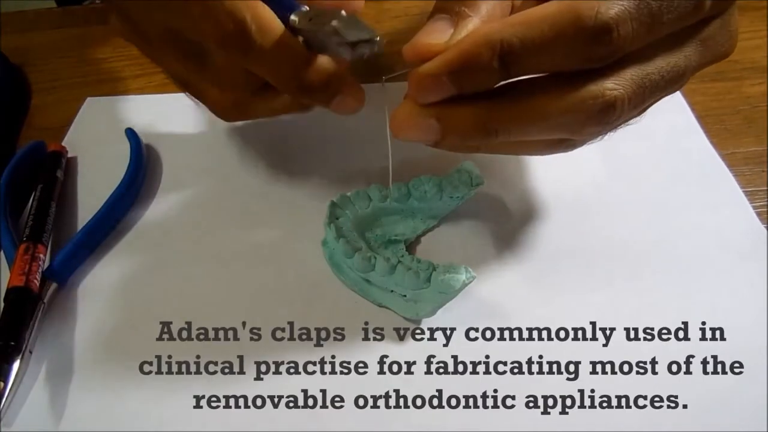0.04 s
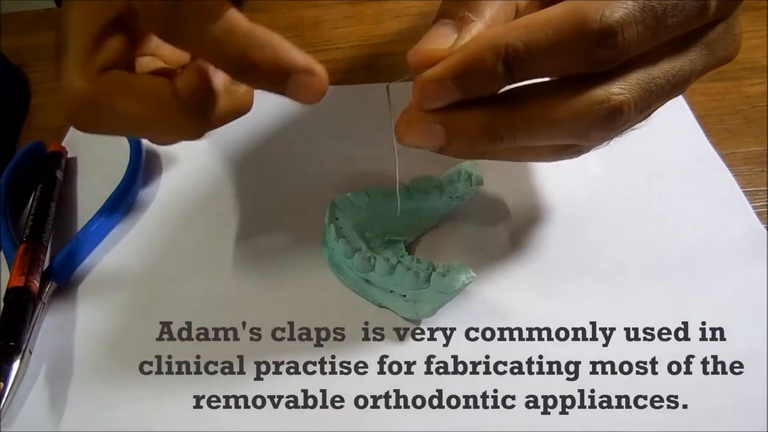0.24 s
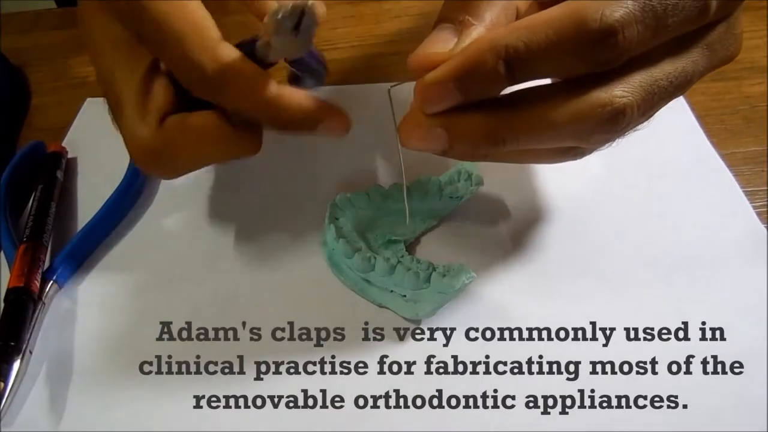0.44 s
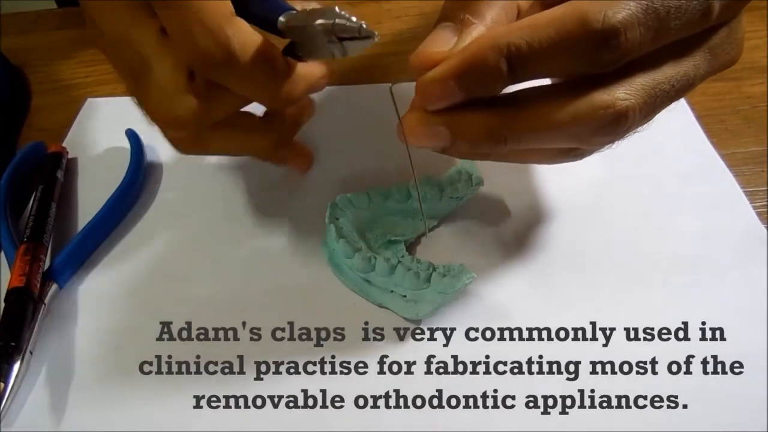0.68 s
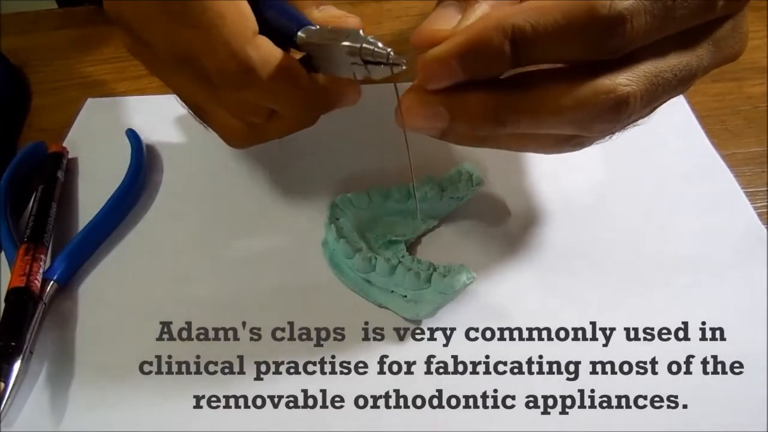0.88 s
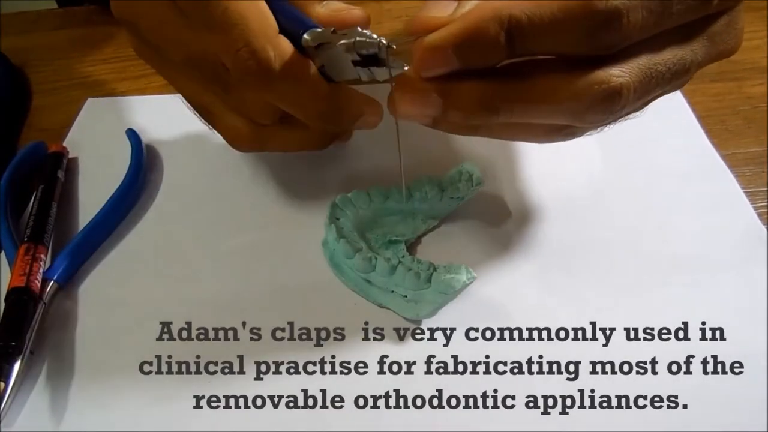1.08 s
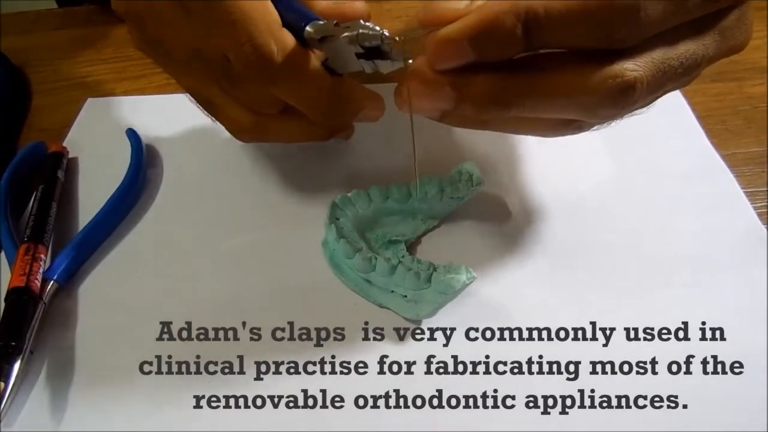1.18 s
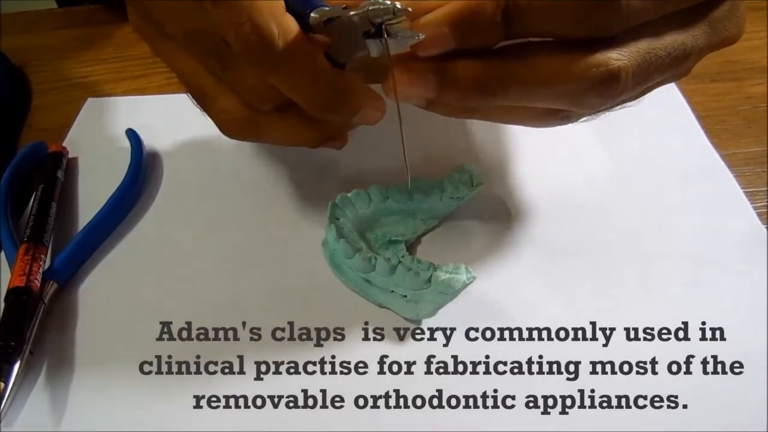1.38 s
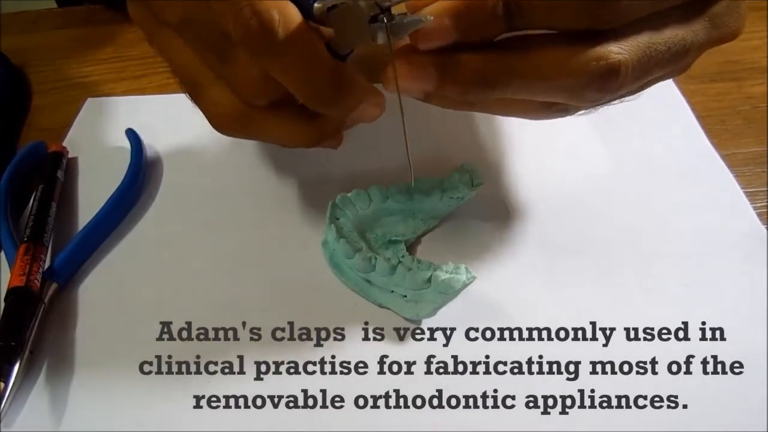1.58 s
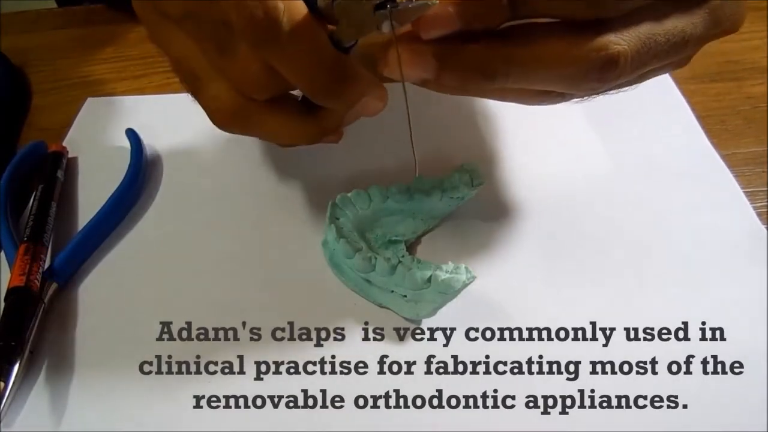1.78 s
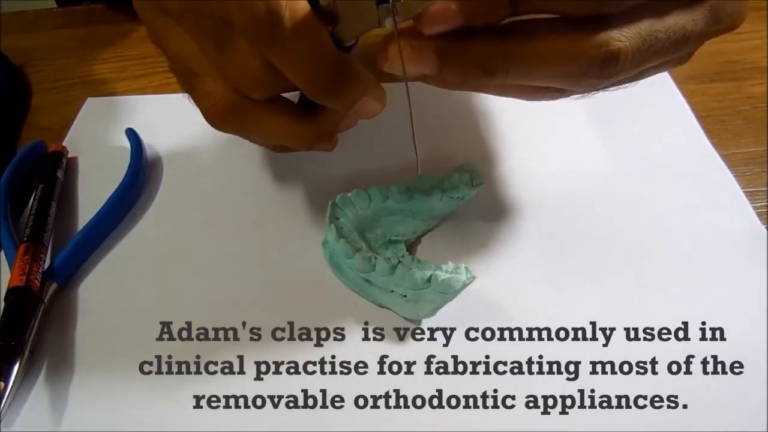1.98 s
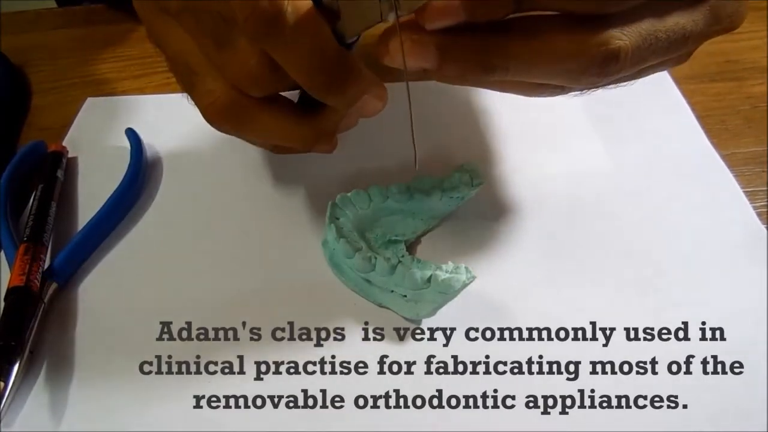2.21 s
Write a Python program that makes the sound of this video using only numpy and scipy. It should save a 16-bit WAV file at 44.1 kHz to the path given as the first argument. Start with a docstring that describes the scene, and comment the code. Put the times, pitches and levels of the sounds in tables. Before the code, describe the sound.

Steel pliers clack close to the microphone, then snap shut as the wooden table gives a short, booming knock. Fingers rub softly, and the jaws tick and scrape on a thin wire in a quiet room.

```python
"""Over the faint rumble of a quiet room, steel pliers clack and bounce, close to the microphone.
The jaws snap shut in a bright cluster of contacts; the wooden work table knocks, booms and echoes.
Then the jaws tick and scrape on a thin wire. In between, fingers rub as they shift their grip.
Struck steel and wood ring in their modes; scrapes and rubs are showers of tiny slips."""
import sys
import numpy as np
from scipy import signal
from scipy.fft import rfft, irfft
from scipy.io import wavfile
from scipy.ndimage import uniform_filter1d, minimum_filter1d

SR = 44100
rng = np.random.default_rng(int(sys.argv[2]) if len(sys.argv) > 2 else 0)


def dump_mix(stems):
    """Bounce the given channels to the path in sys.argv[1] as a 16-bit WAV at rate SR."""
    frames = np.atleast_2d(stems).T  # one column per channel
    limited = np.clip(frames, -1, 1)  # hard clip at full scale
    pcm = np.round(limited * 32767).astype(np.int16)
    wavfile.write(sys.argv[1], SR, pcm)


N = 99225
T = np.arange(N) / SR


def amp(db):
    """Decibels to gain."""
    return 10 ** (np.asarray(db) / 20)


def unit_rms(x):
    """Scales to rms 1."""
    return x / np.sqrt(np.mean(x ** 2) + 1e-20)


def curve_at(points, hz):
    """Interpolates a table on a log-frequency axis."""
    freqs, values = np.transpose(points)
    return np.interp(np.log(hz + 1), np.log(freqs + 1), values)


def colour(x, spectrum):
    """Gives a signal a spectrum, at rms 1."""
    gain = amp(curve_at(spectrum, np.fft.rfftfreq(x.shape[-1], 1 / SR)))
    return unit_rms(irfft(rfft(x) * gain, x.shape[-1]))


def noise(likeness, size=N):
    """White noise at two microphones, from unrelated (likeness 0) to identical (1)."""
    common, left, right = rng.standard_normal((3, size))
    return np.sqrt(likeness) * common + np.sqrt(1 - likeness) * np.array([left, right])


def add(mix, start_s, sound):
    """Mixes a sound in at a time."""
    part = mix[:, max(round(start_s * SR), 0):][:, :sound.shape[-1]]
    part += sound[..., :part.shape[1]]


def pan(left_db):
    """Gains for a left-minus-right level."""
    return amp(np.array([[left_db], [-left_db]]) / 2)


def left_leads(x, by_s):
    """The sound reaches the left microphone a little before the right."""
    shift = np.exp(1j * np.pi * np.fft.rfftfreq(N, 1 / SR) * np.array([[by_s], [-by_s]]))
    return irfft(rfft(x) * shift, N)


def low_cut(x, hz):
    """A small body radiates little below its first mode."""
    return signal.sosfilt(signal.butter(2, hz, "high", fs=SR, output="sos"), x)


def ring(modes, contact_s, size=4096):
    """A struck body's modes build up during contact, then die away."""
    t = T[:size]
    sines = sum(amp(db - 60 * t / t60) * np.sin(2 * np.pi * hz * t) for hz, db, t60 in modes)
    return (1 - np.exp(-t / contact_s)) * sines


def click(spectrum, size=2048):
    """One sharp click with a given spectrum, energy 1."""
    log_gain = np.log(amp(curve_at(spectrum, abs(np.fft.fftfreq(size, 1 / SR)))))
    minimum_phase = np.exp(np.conj(signal.hilbert(log_gain)))
    pulse = irfft(minimum_phase[:size // 2 + 1], size)
    return pulse / np.linalg.norm(pulse)


def burst(spectrum, t60, likeness, size=4096):
    """The dense resonances of a hard contact, as fading noise."""
    fade = amp(-60 * T[:size] / t60)
    rattle = unit_rms(noise(likeness, size) * fade) * np.sqrt(np.mean(fade ** 2))
    return signal.fftconvolve(rattle, click(spectrum)[None], axes=1)[:, :size]


def friction(spectrum, likeness, slips_per_s=9000, spread_db=3.5):
    """Surfaces slide in many tiny slips of uneven size."""
    slips = rng.random(N) < slips_per_s / SR
    sizes = amp(spread_db * np.minimum(rng.exponential(1, N), 4))
    return colour(noise(likeness) * slips * sizes, spectrum)


# The quiet room at the microphone. Each row: frequency in Hz, relative level in dB.
ROOM_TONE = [(12, -36), (20, 2.5), (106, -11), (137, -10.5), (252, -16), (298, -7.5), (324, -19.5),
             (393, -14.5), (565, -18), (631, -14.5), (686, -18), (2210, -21), (15500, -22)]
# How alike it is left and right. Each row: frequency in Hz, correlation.
TONE_LIKENESS = [(60, 0.79), (180, 0.21), (550, 0.28), (1650, 0.045), (4970, 0.02), (15000, 0.15)]


def room_tone():
    """Steady room rumble and microphone hiss."""
    left, unrelated = rfft(rng.standard_normal((2, N)))
    likeness = curve_at(TONE_LIKENESS, np.fft.rfftfreq(N, 1 / SR))
    right = likeness * left + np.sqrt(1 - likeness ** 2) * unrelated
    return amp(-46) * colour(irfft(np.array([left, right]), N), ROOM_TONE)


# Pliers landing close by. Each row: start in seconds, level in dB, low-mode gain in dB.
BOUNCES = [(0.2213, 0.5, -4.5), (.2225, -0.5, 5.5), (0.2279, -4, -9), (0.2315, -18.5, 1.5)]
# Their ringing steel. Each row: frequency in Hz, relative level in dB, t60 in seconds.
PLIER_MODES = [(1754, -20, 0.013), (3760, -14.5, 0.012), (4603, -5, .015), (6450, -9.5, .009),
               (9310, -5.5, 0.012), (9430, -1, 0.012), (12250, -12, .007), (13270, -15, .007),
               (13720, -7, 0.017), (14700, -18, 0.0054)]
# The crack of each contact. Each row: frequency in Hz, relative level in dB.
CRACK_SPECTRUM = [(200, -42), (1000, -37), (1700, -11.5), (2700, -21), (4500, -21), (7500, -10.5),
                  (9500, -5), (11200, -5.5), (13500, 1), (16000, -15)]


def plier_clacks():
    """Steel lands and bounces, each contact a crack and a short ring."""
    rings, cracks, to_room = np.zeros((3, 2, N))
    for start, db, low_db in BOUNCES:
        modes = [(hz, level + low_db * (hz < 8000), t60) for hz, level, t60 in PLIER_MODES]
        add(rings, start, amp(db) * low_cut(ring(modes, contact_s=0.0005), hz=1430))
        add(cracks, start, amp(db - 10.5) * burst(CRACK_SPECTRUM, t60=0.011, likeness=0.51))
    add(to_room, BOUNCES[0][0], amp(-1.5) * click(CRACK_SPECTRUM))
    to_room += amp(-22) * rings  # the ring reaches the room less than the landing's crack
    direct = left_leads(rings + cracks, by_s=18e-6) * pan(left_db=-1)
    return direct + room_tail(to_room, decay_scale=0.45, likeness=0.18)


# The room around the table. Each row: frequency in Hz, t60 in seconds before decay_scale.
ROOM_DECAY = [(200, 0.24), (1500, 0.69), (4500, 0.54), (10000, 0.41), (15000, 0.32)]


def room_tail(x, decay_scale, likeness):
    """The room answers with a diffuse tail that lasts longest in the midrange."""
    hz, t, bands = signal.stft(noise(likeness, size=SR // 2), SR, nperseg=256)
    t60 = decay_scale * curve_at(ROOM_DECAY, hz)[:, None]
    tail = signal.istft(bands * amp(-60 * t / t60), SR, nperseg=256)[1]
    tail *= 1 - np.exp(-T[:tail.shape[1]] / 0.018)  # reflections build up
    return signal.fftconvolve(x, tail / np.linalg.norm(tail[0]), axes=1)[:, :N]


def stroke(middle_s, half_s, db):
    """Smooth rise and fall of one sliding movement."""
    return amp(db) * np.exp(-.5 * ((T - middle_s) / half_s) ** 2)


# Fingers on handles and paper, close up.
# Each row: middle and half length in seconds, hiss level in dB, body level in dB.
GRIP_SHIFTS = [(0.356, 0.023, -48, -54), (.545, 0.019, -42, -58), (.928, 0.025, -46, -54),
               (1.047, 0.077, -52.5, -59), (1.24, 0.023, -48, -52), (1.417, 0.037, -55.5, -52.5),
               (1.675, 0.025, -64, -60)]
# The hiss of a rub and its dull body. Each row: frequency in Hz, relative level in dB.
RUB_HISS_SPECTRUM = [(300, -5.5), (2000, -8), (4500, -3.5), (7000, -8.5), (9000, 0), (12500, -0.5),
                     (16000, -7)]
RUB_BODY_SPECTRUM = [(40, -21), (150, -2), (330, -5.5), (700, -10.5), (1500, -22), (5000, -20)]


def finger_rubs():
    """Skin slides softly, each rub a hiss over a dull body."""
    hiss_level = sum(stroke(middle, half, db) for middle, half, db, _ in GRIP_SHIFTS)
    body_level = sum(stroke(middle, half, db) for middle, half, _, db in GRIP_SHIFTS)
    hiss = hiss_level * friction(RUB_HISS_SPECTRUM, likeness=0.19)
    body = body_level * friction(RUB_BODY_SPECTRUM, likeness=0.73)
    return hiss + body


# Jaws shutting and settling near the microphone.
# Each row: start in seconds, level in dB, t60 of the crack in seconds.
JAW_CONTACTS = [(0.6306, -10, 0.0067), (0.6327, -6.5, 0.012), (0.633, -11.5, 0.023), (.6425, -28, 0.044),
                (0.797, -35, 0.023)]
# The crack of jaw on jaw. Each row: frequency in Hz, relative level in dB.
JAW_SPECTRUM = [(60, -40), (700, -21), (1500, -17), (3200, -13), (4500, -10), (7300, -7), (9000, 0),
                (10000, -6.5), (11200, -2), (13400, -0.5), (15800, -6.5)]
# The ringing jaws. Each row: frequency in Hz, relative level in dB, t60 in seconds.
JAW_RING = [(2790, -21, .012), (4280, -10.5, 0.0089), (5960, -7.5, 0.017), (8980, -2, 0.013),
            (11600, -1.5, 0.012), (13060, -3, 0.023), (15400, -2, .008)]


def jaw_snaps():
    """Jaws close in a quick cluster of bright contacts; the first leaves an even hiss in the room."""
    contacts, to_room = np.zeros((2, 2, N))
    for start, db, t60 in JAW_CONTACTS:
        crack = burst(JAW_SPECTRUM, t60, likeness=0.33)
        add(contacts, start, amp(db) * (ring(JAW_RING, contact_s=0.0005) + crack))
    add(to_room, JAW_CONTACTS[0][0], click(JAW_SPECTRUM))
    direct = left_leads(contacts, by_s=24e-6) * pan(left_db=1)
    return direct + room_tail(to_room, decay_scale=1.26, likeness=0.15)


# The table's knocks, and the boom's soft second swell echoing about 55 ms after the first.
# Each row: start in seconds, level in dB, rise time in seconds.
KNOCKS_AND_ECHO = [(.6310, 1.5, 0.0014), (.684, -6, 0.0079), (0.911, -19, 0.0074)]
# The wooden top, close up. Each row: frequency in Hz, relative level in dB, t60 in seconds.
WOOD_MODES = [(143.9, -32.5, 0.51), (233.3, -47, 0.33), (283, -10.5, 0.034), (294.4, -36, 0.26),
              (426, -34, 0.32), (481, -30.5, 0.092), (869, -21.5, 0.038), (978, -37.5, 0.19),
              (1037, -23.5, 0.043)]
# The table heard through the room. Each row: frequency in Hz, relative level in dB.
BOOM_SPECTRUM = [(40, -29), (100, -17.5), (160, -3.5), (310, -1), (470, -6.5), (720, -17.5), (1080, -15),
                 (1450, -31.5), (4000, -68)]


def table_knocks_and_echo():
    """The table top thumps and booms on; a room reflection swells the first boom again."""
    out = np.zeros((2, N))
    build_up = 1 - np.exp(-T[:SR] / 0.014)
    for start, db, rise_s in KNOCKS_AND_ECHO:
        boom = build_up * burst(BOOM_SPECTRUM, t60=0.32, likeness=0.84, size=SR)
        wood = low_cut(ring(WOOD_MODES, rise_s, size=SR), hz=106)
        add(out, start, amp(db) * (wood + amp(-26.5) * boom))
    return out


# Jaws touching the wire, close up. Each row: start in seconds, level in dB, t60 in seconds.
WIRE_TICKS = [(1.167, -35, 0.018), (1.187, -21, 0.017), (1.236, -40, 0.023), (1.241, -34.5, 0.029),
              (1.433, -30.5, 0.015), (1.445, -41, .015)]
# Wire sliding in the jaws. Each row: middle and half length in seconds, level in dB.
WIRE_SCRAPES = [(1.188, 0.015, -49), (1.251, 0.019, -45), (1.439, 0.0077, -43)]
# The thin tone of a tick and of a scrape. Each row: frequency in Hz, relative level in dB.
TICK_SPECTRUM = [(500, -36), (2500, -22), (3900, -7), (5500, -16), (8300, -5.5), (10500, -10), (12800, 4),
                 (14000, 1), (16000, -8.5)]
SCRAPE_SPECTRUM = [(500, -17), (3000, -18), (6000, -18), (8500, -6), (10500, -17), (12700, 2), (13600, -7),
                   (16000, -24)]


def wire_in_jaws():
    """Thin ticks and short scrapes as the jaws take hold of the wire."""
    direct = friction(SCRAPE_SPECTRUM, likeness=0.4) * sum(stroke(*row) for row in WIRE_SCRAPES)
    for start, db, t60 in WIRE_TICKS:
        add(direct, start, amp(db) * burst(TICK_SPECTRUM, t60, likeness=0.23))
    tail = room_tail(direct, decay_scale=0.79, likeness=0.2)
    return direct * pan(left_db=0.5) + amp(-14) * tail


def scene():
    """Everything that reaches the microphones at the table."""
    return (room_tone() + plier_clacks() + finger_rubs() + jaw_snaps()
            + table_knocks_and_echo() + wire_in_jaws())


def record(dry):
    """A fast limiter holds the loudest peaks to full scale; a low-pass cuts the top treble."""
    safe_gain = 1 / np.maximum(abs(dry).max(0), 1)
    gain = uniform_filter1d(minimum_filter1d(safe_gain, size=65), size=65)
    low_pass = signal.firwin(255, cutoff=15900, window=("kaiser", 8), fs=SR)
    return signal.oaconvolve(gain * dry, low_pass[None], "same", axes=1)


dry = scene()
out = record(dry)
dump_mix(out)
```